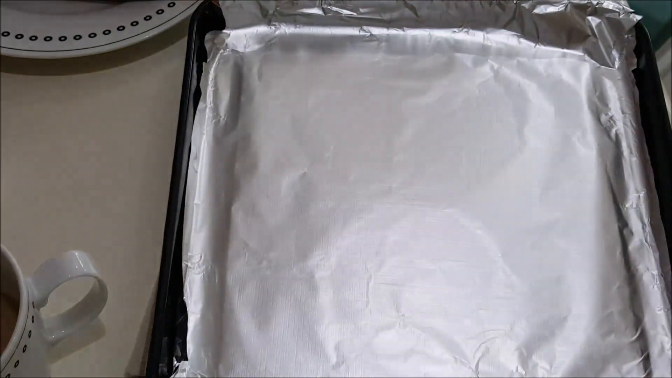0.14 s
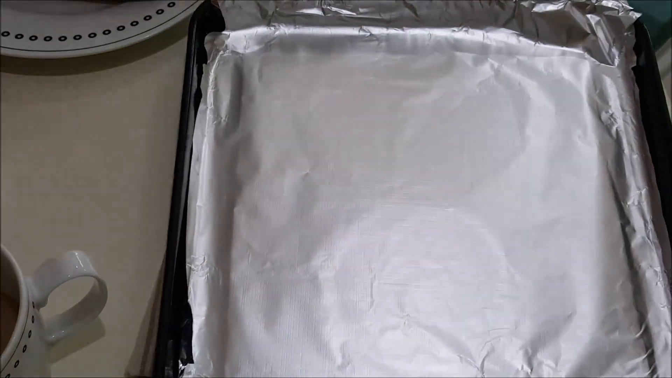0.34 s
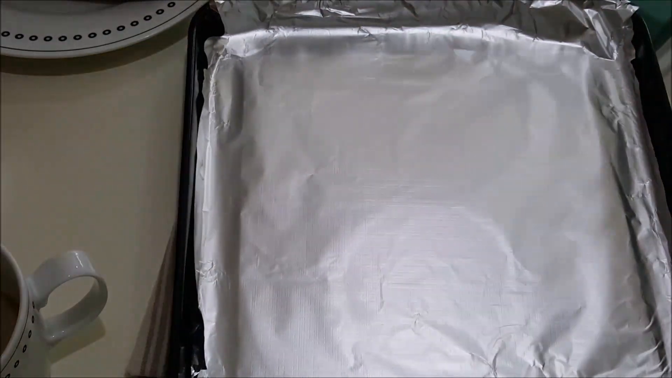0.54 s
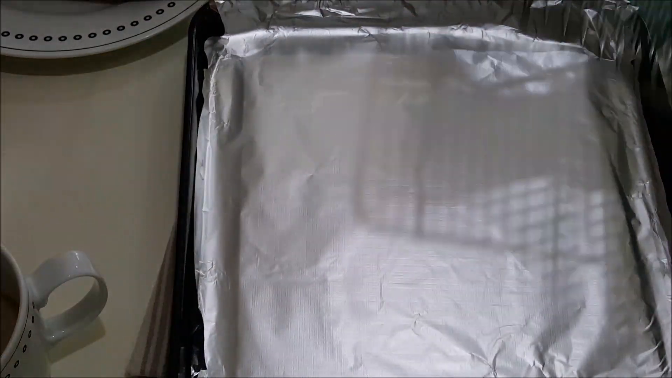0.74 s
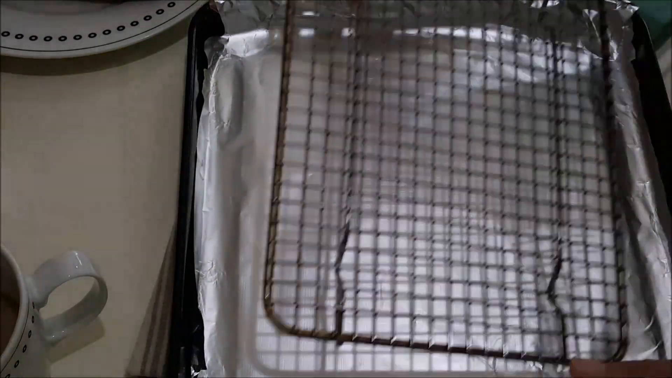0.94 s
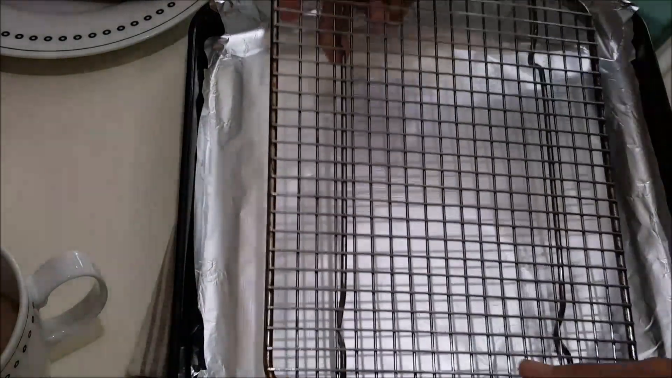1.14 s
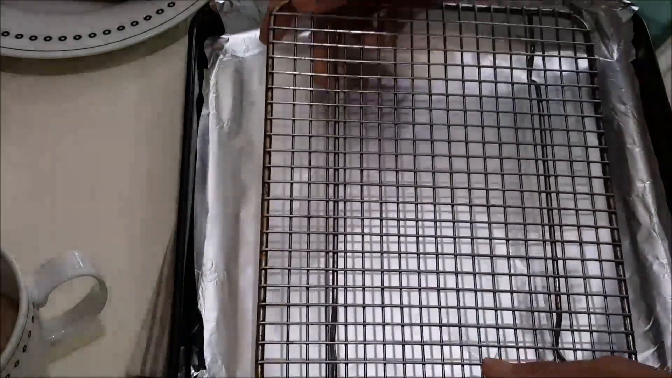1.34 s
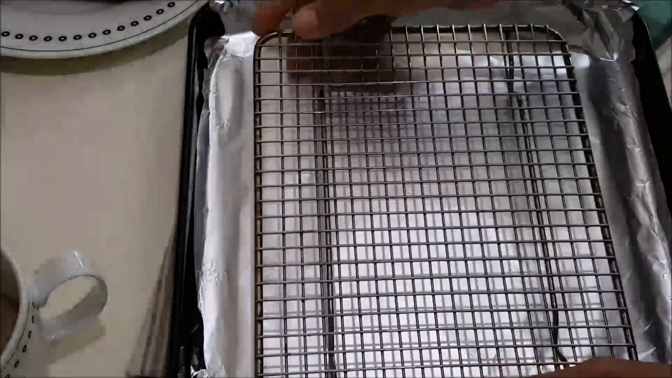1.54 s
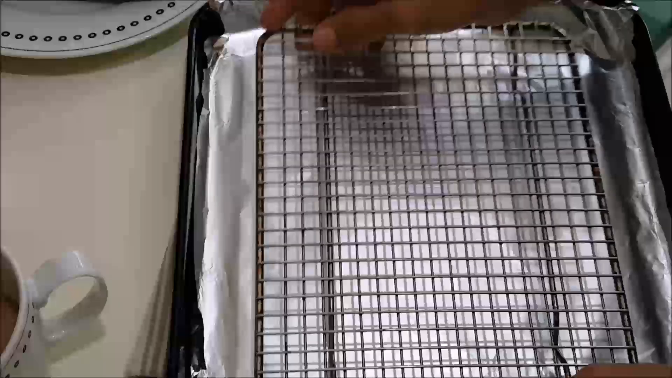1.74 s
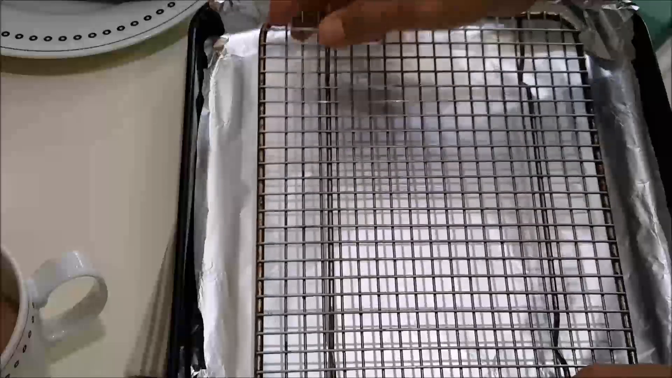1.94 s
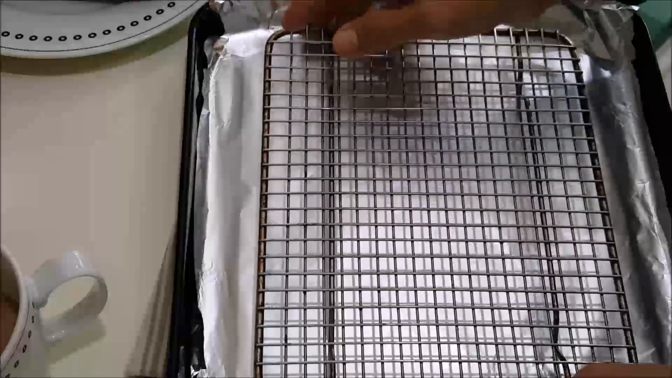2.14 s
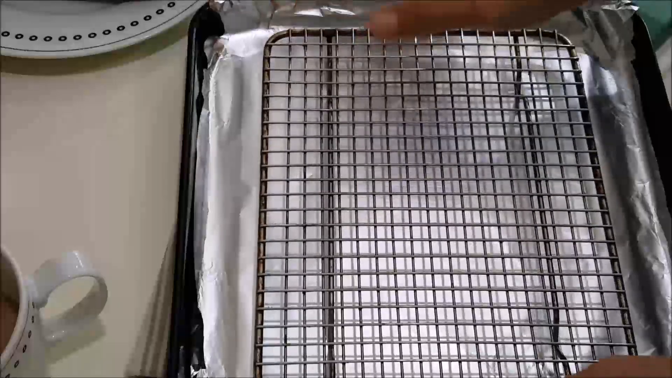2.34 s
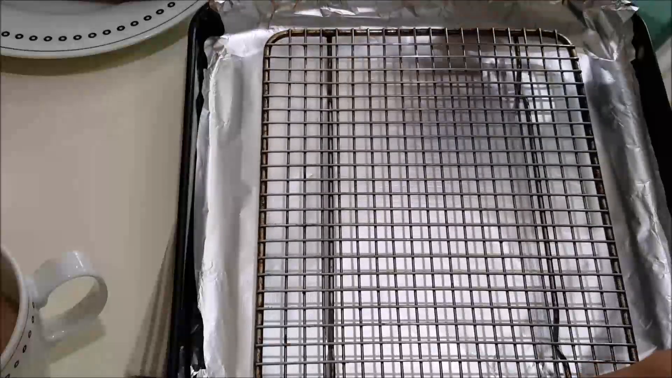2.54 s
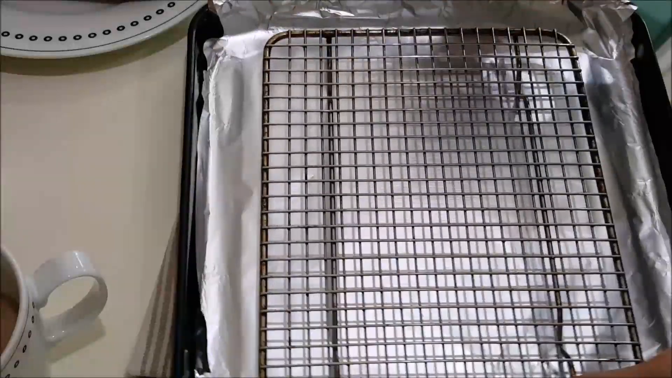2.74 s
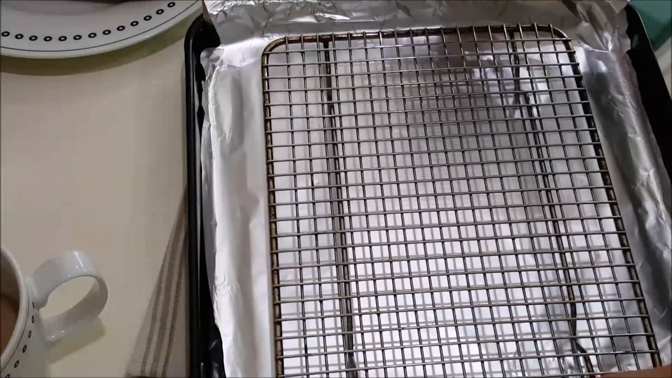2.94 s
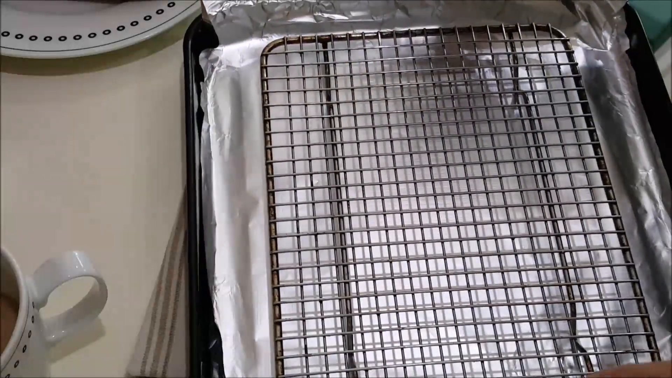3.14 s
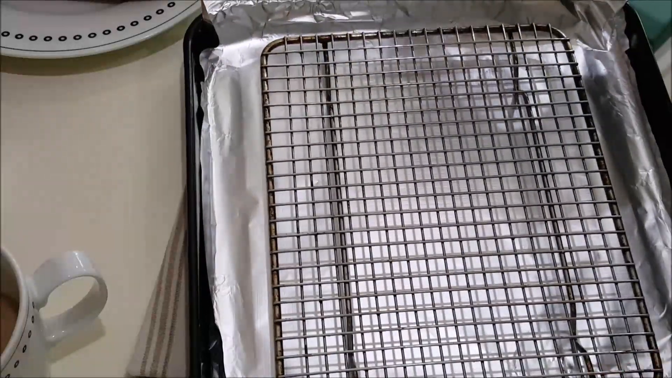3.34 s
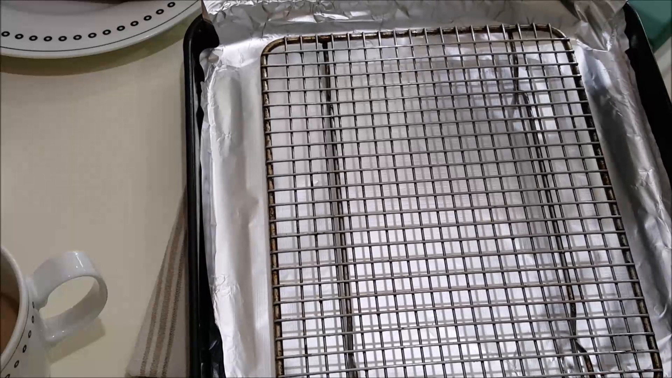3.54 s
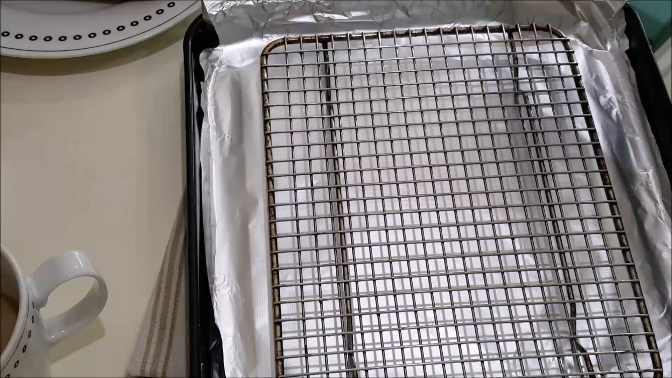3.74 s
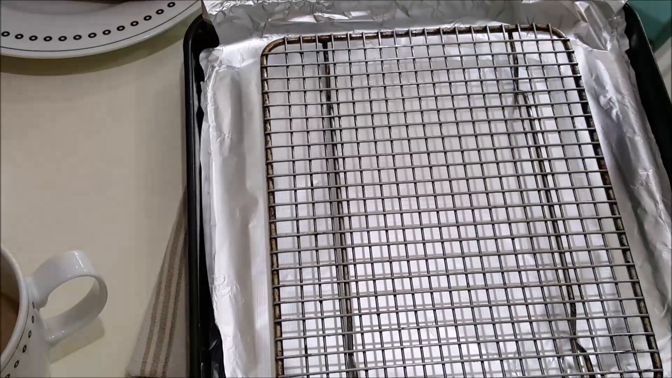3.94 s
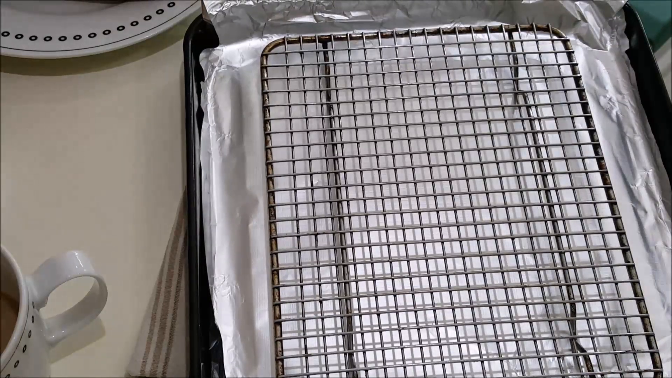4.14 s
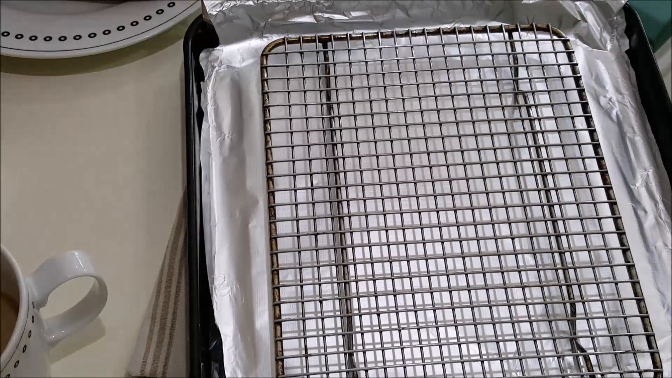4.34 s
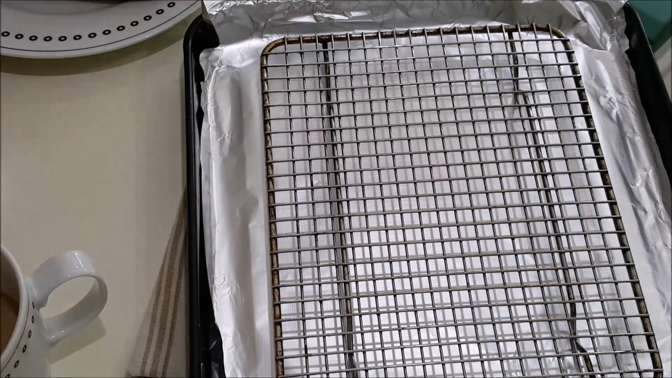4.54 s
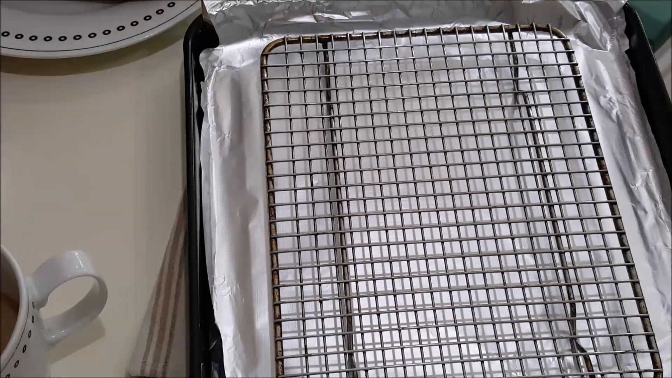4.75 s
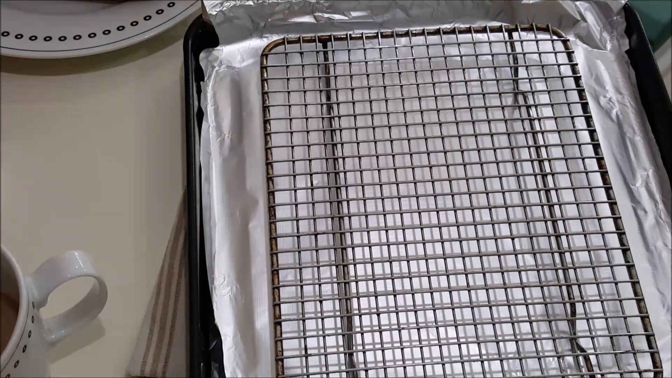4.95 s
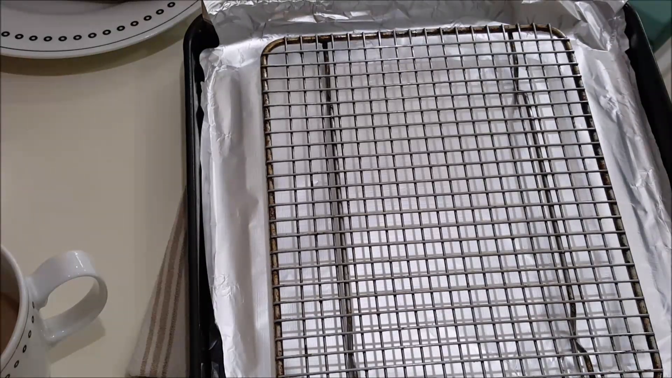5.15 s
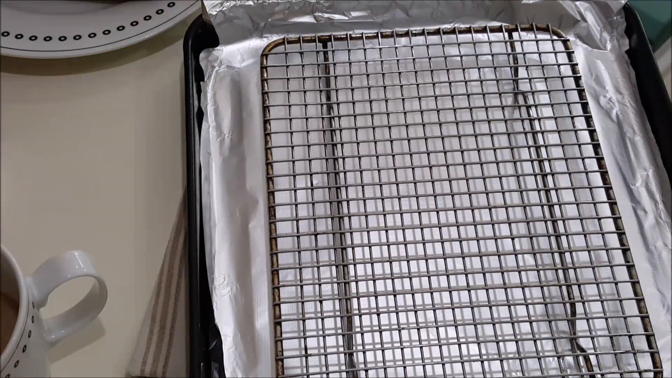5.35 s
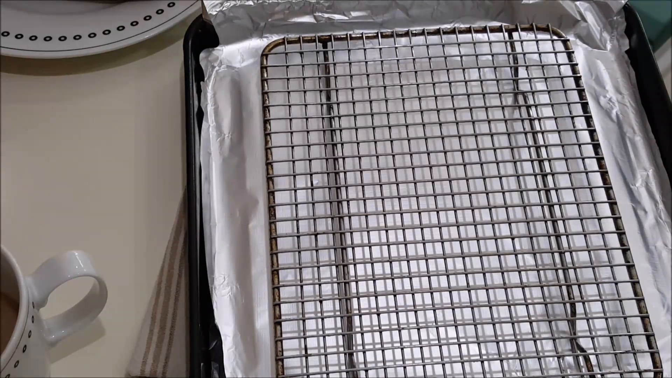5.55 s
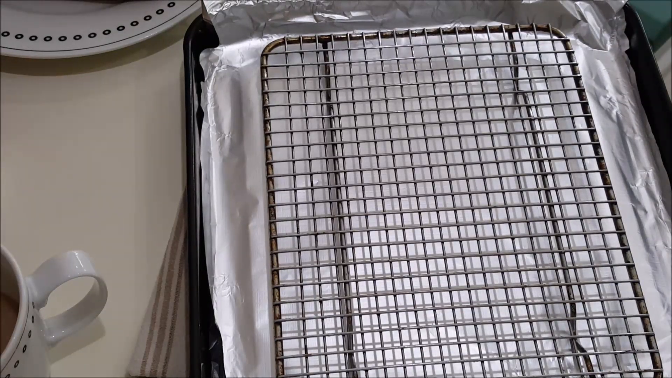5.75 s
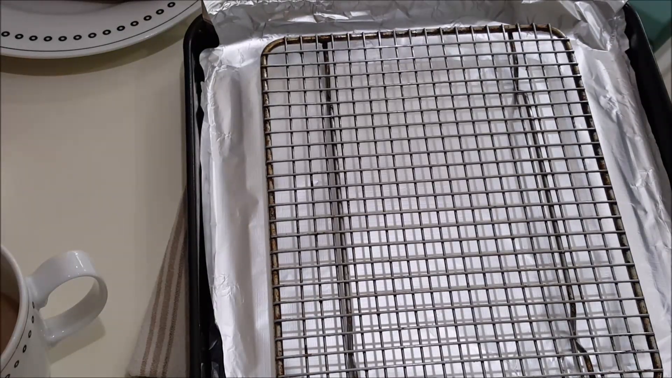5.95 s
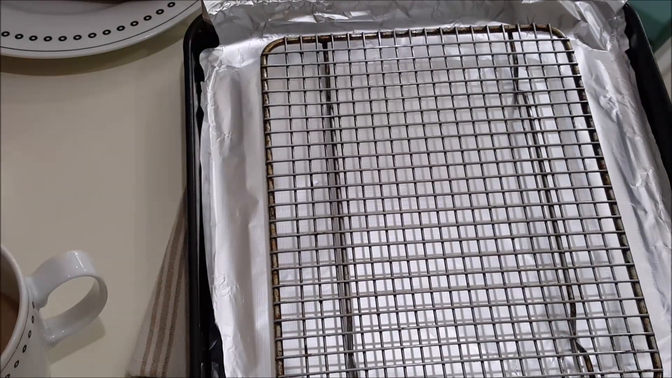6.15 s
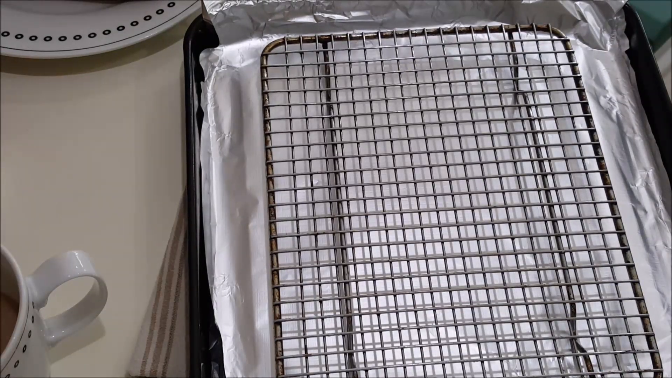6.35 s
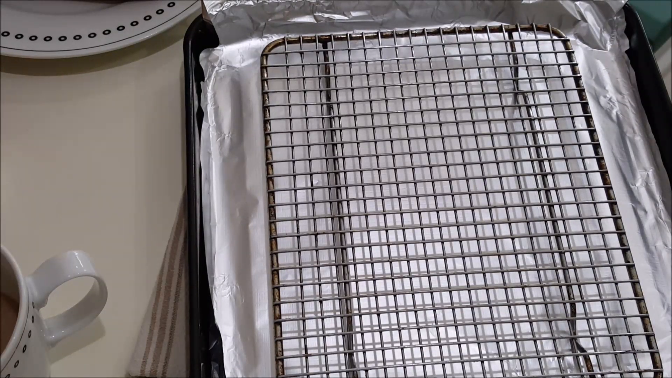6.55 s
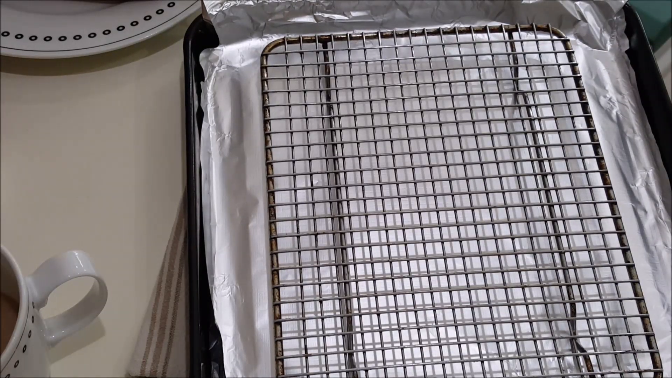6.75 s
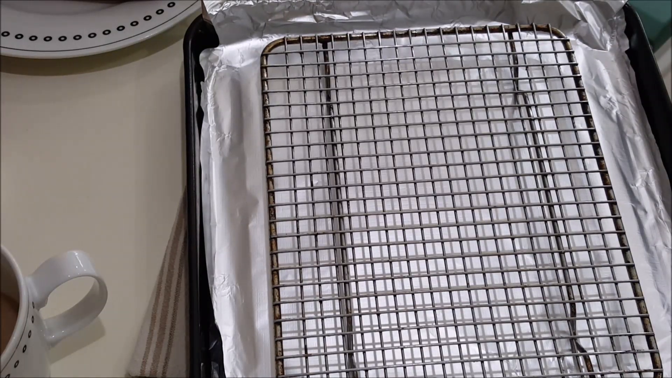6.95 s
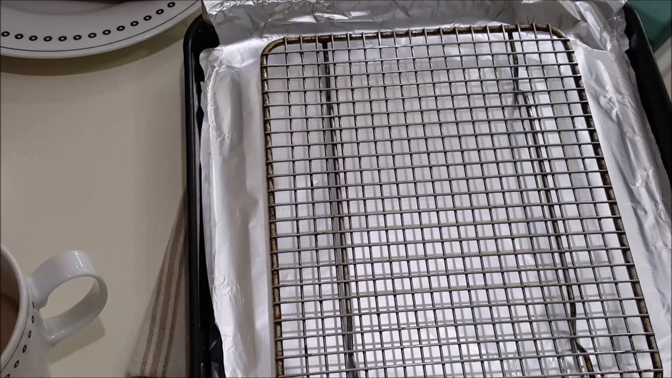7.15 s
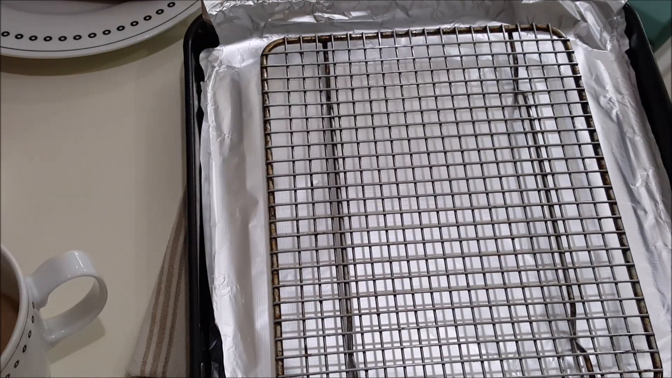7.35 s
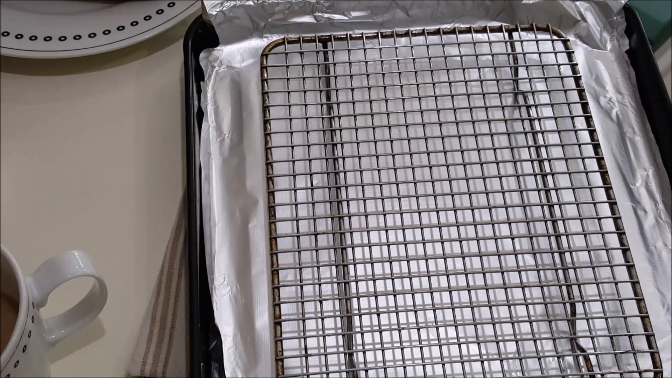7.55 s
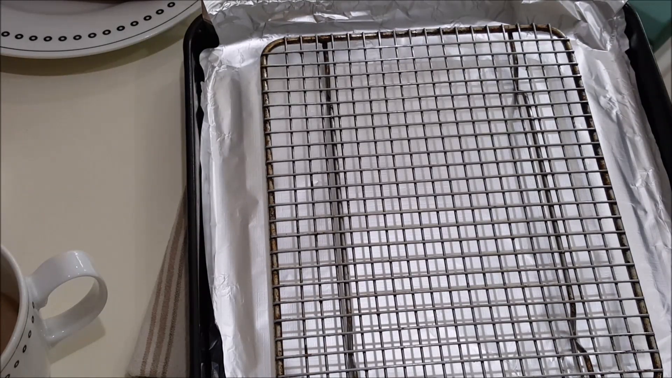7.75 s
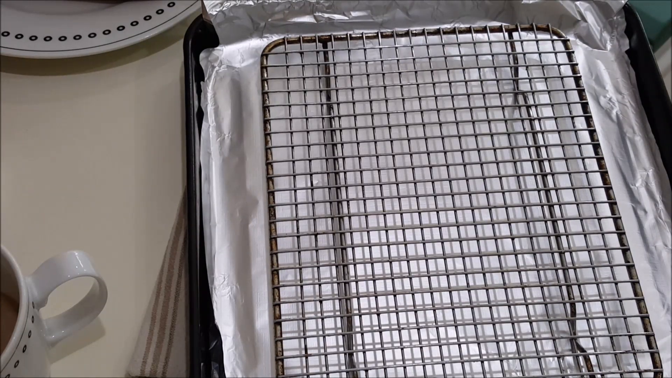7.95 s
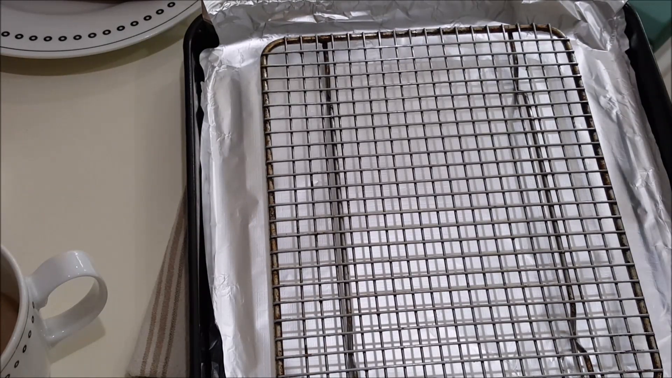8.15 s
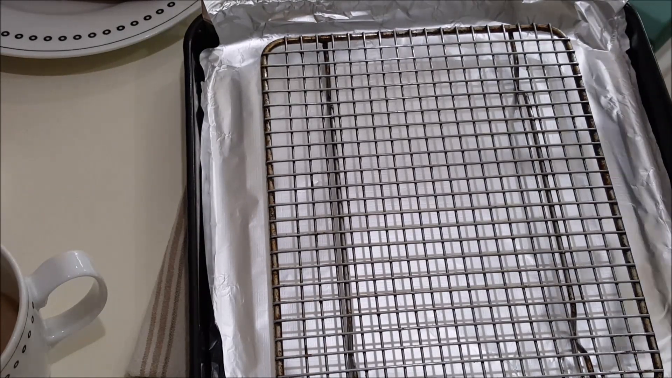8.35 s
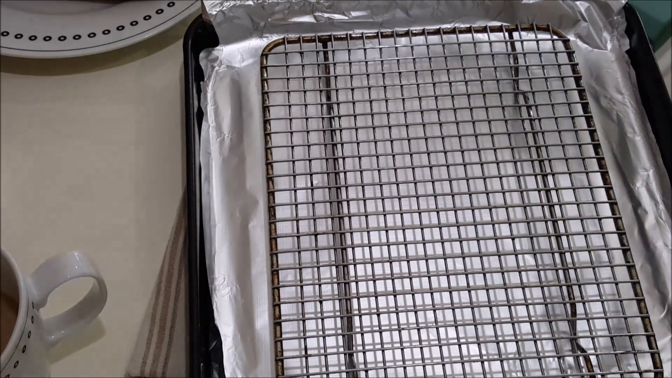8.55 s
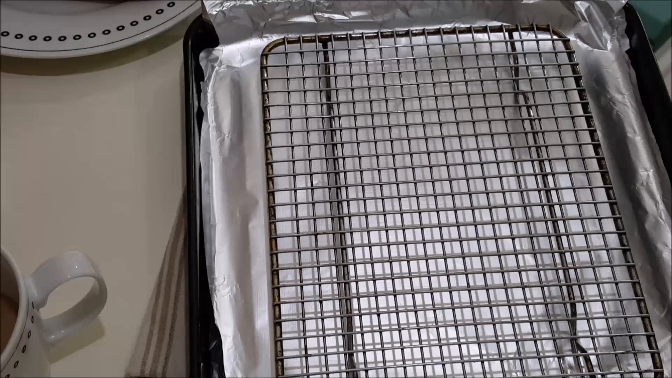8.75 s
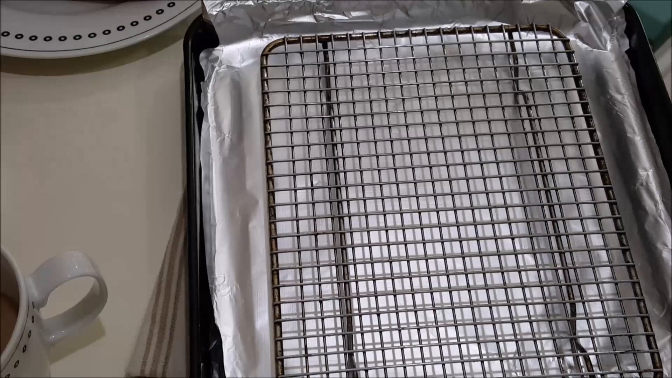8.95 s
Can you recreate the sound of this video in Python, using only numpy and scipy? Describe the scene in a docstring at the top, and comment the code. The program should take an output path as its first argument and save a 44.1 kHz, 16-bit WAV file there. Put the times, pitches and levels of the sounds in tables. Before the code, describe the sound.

Close to the microphone, foil ticks and rustles as fingers press it into a baking tray, crackling on and off until about 3.3 seconds. A wire rack clatters onto the tray at 1.1 and 1.5 seconds, with a short metallic ring and a crunch of foil. Lighter knocks nudge it into place around 2.2, 3 and 3.5 seconds. Slippers scuff softly, mostly between 3.4 and 4.4 seconds. Farther off and slightly right, a drawer rumbles open on rattling rollers from 4.8 seconds, bumping its stop at 5.6. From 6.5 to 7.1 seconds its contents knock hollowly and steel utensils click. The drawer rolls back from 7.4 seconds, with a sharp steel click at 7.8, and shuts with a loud thump at 8.3. Two faint slipper scuffs follow. A quiet appliance motor hums throughout, and the small kitchen adds a short echo.

```python
"""Foil, baking tray and kitchen drawer

In a small kitchen, foil ticks and rustles as fingers press it into a baking tray; a wire rack is
knocked down on it and nudged home, ringing the metal. Slippers scuff away. To the right a drawer
rumbles open on its rollers, steel utensils are shifted and click, and the drawer rolls shut with
a thump. An appliance motor hums throughout."""
import sys
import numpy as np
from scipy import signal
from scipy.fft import rfft, irfft
from scipy.io import wavfile

SR = 44100
rng = np.random.default_rng(int(sys.argv[2]) if len(sys.argv) > 2 else 0)


def materialize(psi):
    """Save the field psi as 16-bit PCM at rate SR to the path in sys.argv[1].

    A 1-D psi becomes a single channel; in a 2-D psi each row is a channel.
    """
    bounded = np.clip(np.atleast_2d(psi).T, -1, 1)
    quanta = np.round(bounded * 32767).astype(np.int16)
    wavfile.write(sys.argv[1], SR, quanta)


N = 396900
TIME = np.arange(N) / SR
HIT_TIME = TIME[:SR * 3 // 4]


def undb(db):
    """Decibels to gain."""
    return 10 ** (np.asarray(db) / 20)


def rms(x):
    """Root mean square."""
    return np.sqrt(np.mean(x ** 2))


def over_hz(hz, points):
    """Read (frequency, value) points on a log-frequency axis."""
    f, value = np.transpose(points)
    return np.interp(np.log(np.maximum(hz, 1)), np.log(f), value)


def response(eq, size=4096):
    """Minimum-phase impulse response of an EQ curve, at unit energy."""
    gain = undb(over_hz(np.fft.rfftfreq(size, 1 / SR), eq))
    cepstrum = irfft(np.log(gain))
    cepstrum[1:size // 2] *= 2
    cepstrum[size // 2 + 1:] = 0
    h = irfft(np.exp(rfft(cepstrum)))
    return h / np.linalg.norm(h)


def through(x, h):
    """Pass a stereo sound through an impulse response."""
    return signal.fftconvolve(x, np.atleast_2d(h), axes=1)[:, :x.shape[1]]


def add(out, s, x):
    """Mix a sound in at time s."""
    i = max(int(s * SR), 0)
    out[:, i:i + x.shape[1]] += x[:, :N - i]


def noise(size, width):
    """Stereo noise: centred in the bass, wide in the treble."""
    mid, side = rng.standard_normal((2, size))
    side = width * signal.sosfilt(signal.butter(1, 650, "high", fs=SR, output="sos"), side)
    return np.array([mid + side, mid - side])


def grit(size, per_s, spread_db, grain_s, width):
    """Dense tiny snaps of unequal strength."""
    snaps = rng.random(size) < per_s / SR
    strength = undb(spread_db * np.minimum(rng.exponential(size=size), 4))
    power = signal.lfilter([1], [1, -np.exp(-2 / (grain_s * SR))], (snaps * strength) ** 2)
    return noise(size, width) * np.sqrt(power / power.mean())


def burst(eq, decay_s, width, rise_s=0.00061):
    """A contact chatters and dies away, coloured by the body it shakes; rms near 1 over the first 20 ms."""
    shape = (1 - np.exp(-HIT_TIME / rise_s)) * np.exp(-HIT_TIME / max(decay_s, rise_s))
    chatter = grit(len(HIT_TIME), per_s=4000, spread_db=0.41, grain_s=0.001, width=width)
    x = through(chatter * shape, response(eq))
    return x / rms(x.mean(axis=0)) * rms(shape) / rms(shape[:SR // 50])


def ring(modes):
    """Struck modes, the higher ones out of step between the ears; rms near 1 over the first 20 ms."""
    hz, db, t60 = np.transpose(modes)[:, :, None]
    phase = 2 * np.pi * rng.random(hz.shape)
    phase = phase + rng.standard_normal((2, len(hz), 1)) * np.minimum(hz / 1400, 1.2)
    x = (undb(db - 60 * HIT_TIME / t60) * np.sin(2 * np.pi * hz * HIT_TIME + phase)).sum(axis=1)
    return x * (1 - np.exp(-HIT_TIME / .001)) / rms(x[:, :SR // 50])


def strokes(rows):
    """Envelope of rubbing strokes that swell to a peak and fade."""
    return sum(undb(db) * np.exp(-np.where(TIME < s, ((TIME - s) / rise) ** 2, (TIME - s) / decay))
               for s, db, rise, decay in rows)


def gesture(start, length, swell_db_per_s, attack_s, release_s):
    """Envelope of one hand movement: it gets going, swells or eases steadily, then runs out."""
    t = TIME - start
    edges = np.exp(-(np.minimum(t, 0) / attack_s) ** 2 - np.maximum(t - length, 0) / release_s)
    return edges * undb(swell_db_per_s * np.clip(t, 0, length))


def appliance(air_db=-67, waver_hz=14):
    """A motor hums, wavering in level and phase, over a soft rush of air."""
    air_eq = [(20, -28), (45, -28.5), (90, -10.5), (150, -17), (240, -15.5), (320, -14), (430, -14.5),
              (900, -25), (1600, -30), (3700, -35.5), (8000, -45), (15500, -41.5)]  # rushing air: f/Hz, level/dB
    hum = [(81.9, -64.5, 0.18), (237.4, -82.5, 0.43), (445.4, -77.5, 0.64)]  # motor tones: f/Hz, level/dB, waver depth
    out = undb(air_db) * through(noise(N, 0.9), response(air_eq))
    for hz, db, waver in hum:
        drift = rng.standard_normal((400, 2)) @ [1, 1j]
        sway = 1 + waver * np.interp(TIME * waver_hz, np.arange(len(drift)), drift)
        out += np.sqrt(2) * undb(db) * np.real(sway * np.exp(2j * np.pi * hz * TIME))
    return out


def empty_tray(ring_db=-53, rattle_db=-53):
    """The empty tray still rings faintly from being handled."""
    modes = [(142, 2, 0.72), (583, -0.5, 0.56), (683, -4, .2), (807, 2, 0.53), (1180, -11, 0.28),
             (1220, 5, 0.48), (1650, 2.5, 0.49), (2190, -8, 0.32)]  # sheet metal ring: f/Hz, level/dB, t60/s
    rattle_eq = [(300, -17), (560, -0.5), (950, -14.5), (1200, -2), (1400, -16), (1660, -17), (1820, -8),
                 (1980, -9), (2400, -16.5), (5000, -30.5)]  # tinny rattle: f/Hz, level/dB
    out = np.zeros((2, N))
    add(out, 0, undb(ring_db) * ring(modes))
    add(out, 0, undb(rattle_db) * burst(rattle_eq, decay_s=0.073, width=1))
    return out


def foil(rustle_db=-3, settle_db=-14.5, settle_s=0.016):
    """Single creases snap and crackle on as they settle, over the fine rustle of sliding fingers."""
    creases = [(0.0302, -48, 0.0043), (0.0986, -47, 0.008), (0.1358, -36.5, 0.0071), (0.172, -43, 0.0037),
               (0.242, -48.5, 0.0032), (0.3363, -45, 0.0015), (0.3617, -40, 0.0059), (0.403, -46, 0.0025),
               (0.5212, -57, .003), (0.584, -42.5, .002), (0.593, -51, 0.0032), (0.6317, -46, 0.0035),
               (1.3007, -45.5, .005), (1.426, -44, .008), (1.5414, -40, .004), (1.6738, -49.5, .003),
               (1.728, -54.5, .003), (1.7786, -48.5, 0.0033), (1.838, -37, 0.0043), (2.085, -63, .004),
               (2.1942, -43, 0.0036), (2.307, -43.5, .004), (2.397, -41.5, 0.0069), (2.767, -44.5, .003),
               (2.7838, -44.5, 0.0035), (2.907, -52.5, .004), (3.156, -39.5, 0.003), (3.187, -38.5, 0.0072)]  # snaps: t/s, peak/dB, decay/s
    slides = [(0.01, 0.21, -63.5, 5), (0.377, 0.15, -63, -70), (0.623, 0.011, -57.5, -20),
              (1.565, 0.28, -63.5, -10), (2.344, 0.065, -60, 50), (2.459, 0.11, -55, -16),
              (2.687, 0.037, -67, 0), (2.967, 0.13, -70, 0), (3.156, .12, -51.5, -11)]  # finger moves: t/s, length/s, level/dB, swell/(dB per s)
    foil_eq = [(300, -4.5), (1000, -12.5), (2400, -2), (4500, -6.5), (7800, -2), (11000, -3.5), (15500, -5)]  # bright crinkle: f/Hz, level/dB
    sliding = sum(undb(db) * gesture(s, length, swell, attack_s=0.0097, release_s=0.033)
                  for s, length, db, swell in slides)
    out, settling = np.zeros((2, N)), np.zeros((1, N))
    for s, db, decay in creases:
        snap = burst(foil_eq, decay, width=1)
        add(out, s, undb(db) * snap / np.abs(snap.mean(axis=0)).max())
        add(settling, s, undb(db + settle_db) * np.exp(-HIT_TIME / settle_s)[None])
    crackle = through(grit(N, per_s=1400, spread_db=2.8, grain_s=.0008, width=1), response(foil_eq))
    return out + crackle * np.hypot(sliding, settling) * undb(rustle_db)


def slippers(scuff_db=-2):
    """Soles drag over the floor in short swishes."""
    scuffs = [(.835, -52, 0.026, 0.028), (3.39, -60, 0.032, 0.12), (3.91, -65, 0.05, 0.035),
              (4.03, -69.5, 0.053, 0.049), (4.135, -51.5, 0.019, 0.026), (4.37, -67, 0.031, 0.038),
              (5.54, -61, 0.02, 0.017), (5.85, -66.5, 0.04, 0.014), (6.915, -50.5, 0.0079, 0.018),
              (8.54, -51, 0.027, 0.029), (8.635, -54, 0.024, 0.026)]  # steps: t/s, level/dB, rise/s, decay/s
    sole_eq = [(200, -18.5), (900, -9), (1800, -4.5), (2800, -2), (3700, -6.5), (5200, -12.5), (8000, -20),
               (11000, -24.5), (15500, -27)]  # sole on floor: f/Hz, level/dB
    friction = grit(N, per_s=3000, spread_db=4, grain_s=0.0031, width=1)
    return through(friction, response(sole_eq)) * strokes(scuffs) * undb(scuff_db)


def rack(chatter_db=-13.5, ring_db=-12.5, crunch_db=-1):
    """The rack's feet chatter on the tray, ring it, crush the foil and thud into the counter."""
    # rack meets tray: t/s, level/dB, foil crunch/dB, chatter decay/s, cutoff/Hz, thud/dB
    knocks = [(1.071, -24, -40, 0.021, 5800, -60), (1.21, -41.5, -61.5, 0.049, 3500, -57),
              (1.471, -24, -49, 0.028, 2800, -45.5), (2.201, -32, -49.5, 0.027, 2600, -55.5),
              (2.341, -41, -66, 0.044, 2470, -62), (3.004, -48.5, -65.5, 0.027, 2600, -74),
              (3.53, -39.5, -65.5, 0.024, 1530, -66.5), (3.544, -40.5, -74, 0.039, 1410, -57.5)]
    modes = [(371.2, 3.5, 0.27), (396, -1.5, 0.19), (511, -3, 0.26), (718, -8, .2), (1608, -1.5, 0.16),
             (587, -2.5, 0.29), (780, 1, 0.24), (885, -2.5, 0.19), (1056, 4, 0.12), (1180, 5, 0.083),
             (1460, -11.5, 0.42), (1650, -19.5, 0.087), (1780, -9, 0.27), (1894, -6.5, 0.35),
             (2220, 3, 0.22), (2290, -4.5, 0.17), (2630, 7.5, 0.09), (3070, -1, 0.28), (3460, -4, .12),
             (4060, -3.5, 0.2)]  # tray and rack ringing together: f/Hz, level/dB, t60/s
    chatter_eq = [(60, -45), (130, 1), (290, -14.5), (380, 1), (1500, -1), (3000, -2), (5000, -5.5),
                  (9000, -37)]  # wire on tray: f/Hz, level/dB
    crunch_eq = [(500, -30), (2000, -2), (4500, -7.5), (8000, -4), (11000, -7), (15500, -12.5)]  # crushed foil: f/Hz, level/dB
    thud_eq = [(40, -17), (85, -7.5), (115, 2.5), (190, -10), (250, 0), (310, -18), (600, -14), (1500, -46)]  # counter: f/Hz, level/dB
    out = np.zeros((2, N))
    for s, db, foil_db, decay, cutoff_hz, thud_db in knocks:
        clang = undb(chatter_db) * burst(chatter_eq, decay, width=0.87) + undb(ring_db) * ring(modes)
        soften = signal.butter(2, cutoff_hz, fs=SR, output="sos")  # a softer contact has less treble
        add(out, s, undb(db) * signal.sosfilt(soften, clang))
        add(out, s, undb(foil_db + crunch_db) * burst(crunch_eq, decay_s=0.016, width=1))
        add(out, s, undb(thud_db) * burst(thud_eq, decay_s=0.04, width=0.45))
    return out


def drawer_slide(rumble_db=-3, rattle_db=-2):
    """A hand brushes and moves the drawer; rollers shake the cabinet and rattle on their runners."""
    brushes = [(4.76, -64.5, 0.047, 0.15), (4.815, -67, 0.019, 0.037), (4.87, -58, 0.017, 0.034),
               (5.85, -73, 0.035, 0.02), (6.83, -67, 0.019, .02), (8.2, -59.5, 0.02, 0.028),
               (8.95, -61, 0.024, 0.078)]  # hand on drawer: t/s, level/dB, rise/s, decay/s
    pushes = [(4.874, 0.015, -45.5, -50.5, 0), (4.944, 0.057, -40.5, -53, -6), (5.06, 0.18, -45, -60, -7),
              (5.3, 0.15, -44.5, -56.5, -6), (5.525, 0.35, -55, -66, -17), (6.486, 0.14, -64, -61, 42),
              (6.796, .2, -61.5, -62.5, 21), (7.416, .34, -58, -70, 31), (7.828, 0.18, -42.5, -54, -4),
              (7.978, 0.28, -43.5, -59.5, -13.5)]  # pulls and pushes: t/s, length/s, rumble/dB, rattle/dB, swell/(dB per s)
    skin_eq = [(1000, -7), (4500, -5), (7200, -1), (9000, -3.5), (11000, -3), (13500, -0.5), (15500, -3.5)]  # hiss of skin: f/Hz, level/dB
    rumble_eq = [(30, -50), (70, -11.5), (110, 6.5), (175, 0), (210, -4.5), (265, -4), (380, -15),
                 (650, -21.5), (1500, -47.5)]  # shaken cabinet: f/Hz, level/dB
    runner_eq = [(150, -3), (500, 3), (1050, 2), (1350, 0.5), (1650, 1.5), (1950, -1.5), (2300, -3.5),
                 (3200, -8.5), (5500, -20), (8000, -25), (11000, -32), (15500, -33)]  # rattling runners: f/Hz, level/dB
    moves = [undb([[low_db], [high_db]]) * gesture(s, length, swell, attack_s=.035, release_s=0.055)
             for s, length, low_db, high_db, swell in pushes]
    rumble_gain, rattle_gain = np.max(moves, axis=0)  # each push takes over from the last
    rumble = through(grit(N, per_s=250, spread_db=1.64, grain_s=0.0063, width=0.23), response(rumble_eq))
    rattle = through(grit(N, per_s=300, spread_db=2.3, grain_s=0.012, width=0.98), response(runner_eq))
    hand = through(noise(N, 1), response(skin_eq)) * strokes(brushes)
    return rumble * rumble_gain * undb(rumble_db) + rattle * rattle_gain * undb(rattle_db) + hand


def drawer_knocks(bump_db=-10, ring_db=1, bump_clatter_db=-3, thump_db=-7):
    """The drawer thumps against its stops; its contents bump the box and clatter."""
    thumps = [(5.586, -39.5, -72, 0.03), (7.179, -47.5, -68, 0.045), (7.425, -45.5, -79, 0.022),
              (7.808, -35, -51, 0.06), (8.3235, -24, -42, 0.024), (8.341, -27.5, -40, 0.027),
              (8.938, -50.5, -58.5, 0.22)]  # hitting the stops and settling: t/s, level/dB, clatter/dB, decay/s
    bumps = [(6.489, -43.5, -53, 0.14, -48), (6.595, -28.5, -42.5, 0.028, -60),
             (6.825, -57.5, -73, 0.015, -59.5), (6.8755, -50.5, -60, 0.014, -52),
             (6.907, -46, -60, 0.017, -60), (6.935, -43.5, -50, 0.025, -70),
             (7.011, -40.5, -47.5, 0.032, -59), (7.054, -44.5, -67, 0.0074, -74)]  # things knocking inside: t/s, level/dB, clatter/dB, decay/s, tick/dB
    box_modes = [(235, 7, 0.17), (251, 9.5, 0.12), (326, -5, 0.14), (422, 5, 0.11), (429, 6, 0.091),
                 (491, -4, 0.28), (541, 2, 0.2)]  # hollow wooden ring: f/Hz, level/dB, t60/s
    box_eq = [(100, -30), (240, -7.5), (430, -5.5), (580, -4), (750, -43), (1500, -48), (4000, -35)]  # dull knock of the box: f/Hz, level/dB
    tick_eq = [(500, -31), (1700, -4), (2150, 12), (2550, 11), (3000, 2.5), (3650, -4), (4200, -2),
               (4900, -4.5), (6000, -18), (8500, -31), (15500, -20)]  # sharp tick of a handle: f/Hz, level/dB
    clatter_eq = [(300, -1), (900, 9), (1400, 4.5), (2300, 7), (4000, -5.5), (6000, -10), (8000, -13),
                  (11000, -20), (15500, -34)]  # loose contents: f/Hz, level/dB
    cabinet_eq = [(30, -28), (70, -7), (110, 1.5), (160, -4), (260, -3), (340, -9.5), (520, -14),
                  (750, -24.5), (1500, -47.5)]  # boom of the cabinet: f/Hz, level/dB
    out = np.zeros((2, N))
    for s, db, clatter_db, decay, tick_db in bumps:
        add(out, s, undb(tick_db) * burst(tick_eq, decay_s=0.019, width=0.53))
        box = burst(box_eq, decay, width=0.52) + undb(ring_db) * ring(box_modes)
        add(out, s, undb(db + bump_db) * box)
        add(out, s, undb(clatter_db + bump_clatter_db) * burst(clatter_eq, decay, width=0.56))
    for s, db, clatter_db, decay in thumps:
        add(out, s, undb(db + thump_db) * burst(cabinet_eq, decay, width=0.39))
        add(out, s, undb(clatter_db) * burst(clatter_eq, decay, width=0.62))
    return out


def utensils(ring_db=-21):
    """Steel on steel: a hard tick and a faint thin ring."""
    clicks = [(5.439, -57, .0035), (6.597, -51, 0.0053), (6.782, -63, 0.018), (7.01, -55, 0.0057),
              (7.82, -30.5, 0.0041)]  # utensils touching: t/s, level/dB, decay/s
    tick_eq = [(500, -31), (1600, -0.5), (2400, 3.5), (3700, -1.5), (5500, 2), (7500, -1), (10000, -2.5),
               (11800, -1), (13500, -6), (15500, -6)]  # steel contact: f/Hz, level/dB
    modes = [(2137, -10, .45), (2288, 0, .3), (3311, -6, .33), (3960, -4, .2), (4538, -9, .44),
             (4764, -4, .9), (5443, -9, .43), (6250, -5, .33), (6634, 1, .28), (8430, -5, .12),
             (8640, -7, .2), (11340, -11, .2), (11850, -12, .2)]  # cutlery ring: f/Hz, level/dB, t60/s
    out = np.zeros((2, N))
    for s, db, decay in clicks:
        add(out, s, undb(db) * (burst(tick_eq, decay, width=0.38) + undb(ring_db) * ring(modes)))
    return out


def kitchen(send, build_s=0.0056):
    """Diffuse reflections from hard walls; the mids ring longest."""
    reverb_times = [(100, 0.43), (700, 0.63), (4000, 0.54), (14000, 0.4)]  # room decay: f/Hz, t60/s
    hz, s, cells = signal.stft(noise(len(HIT_TIME), 1), SR, nperseg=256)
    cells *= undb(-60 * s / over_hz(hz, reverb_times)[:, None])
    tail = signal.istft(cells, SR)[1][:, :len(HIT_TIME)]
    tail *= 1 - np.exp(-(HIT_TIME / build_s) ** 2)
    return through(send, tail / np.linalg.norm(tail[0]))


def to_the_right(x, pan_db, lag_s=.00025):
    """A source on the right reaches the left ear later and weaker."""
    return np.array([np.interp(TIME - lag_s, TIME, x[0]) * undb(-pan_db / 2), x[1] * undb(pan_db / 2)])


def scene():
    """The tray lies close to the microphone; drawer and feet are further off and wetter."""
    crinkle = foil()
    tray = empty_tray() + rack()
    drawer = drawer_slide() + drawer_knocks()
    steel, feet = utensils(), slippers()
    send = undb(-10) * crinkle + undb(-9) * tray + undb(-4) * (drawer + steel) + undb(-2) * feet
    aside = to_the_right(drawer, pan_db=1) + to_the_right(steel, pan_db=4)
    return crinkle + tray + feet + aside + kitchen(send) + appliance()


def record(dry, left_db=1.1, top_hz=16000):
    """The microphone ports add a small treble resonance, the left a little louder; the top is cut."""
    mic_eq = [(20, 1.5), (7000, 0.5), (8600, 4), (9600, -4), (12500, -3.5), (15000, -4), (16000, -10)]  # port colour: f/Hz, level/dB
    coloured = irfft(rfft(dry) * undb(over_hz(np.fft.rfftfreq(N, 1 / SR), mic_eq)), N)
    balance = undb([[left_db / 2], [-left_db / 2]])
    return signal.sosfilt(signal.ellip(10, .2, 70, top_hz, fs=SR, output="sos"), coloured * balance)


dry = scene()
out = record(dry)
materialize(out)
```